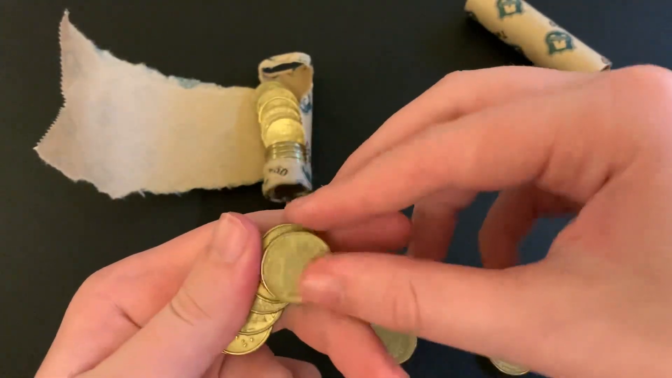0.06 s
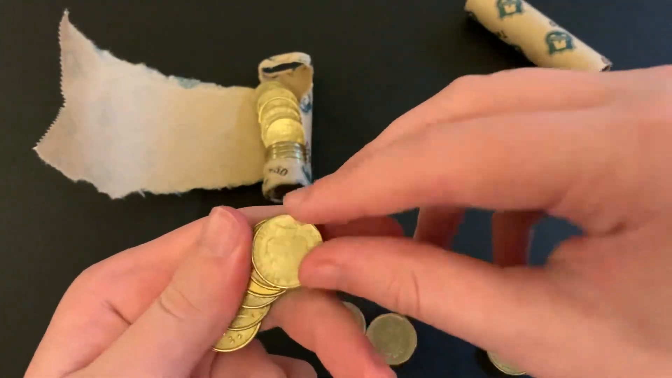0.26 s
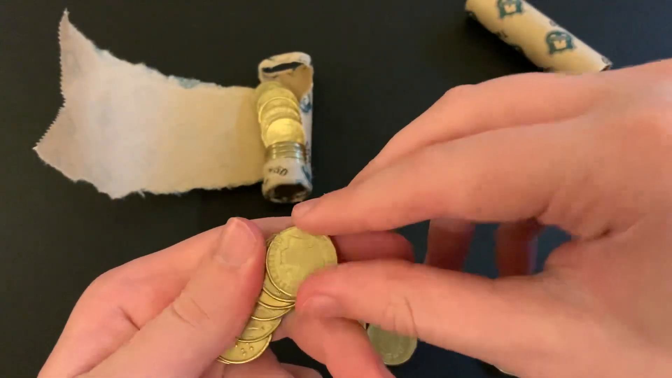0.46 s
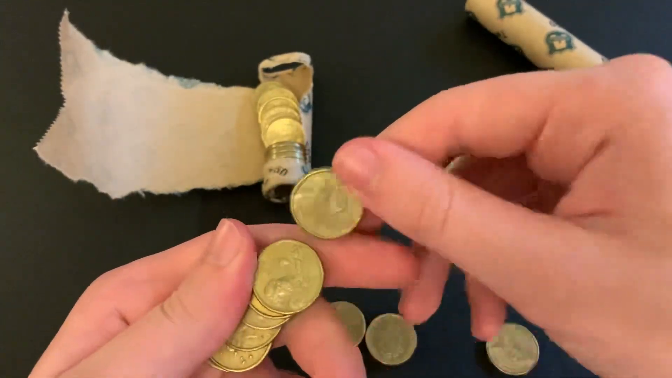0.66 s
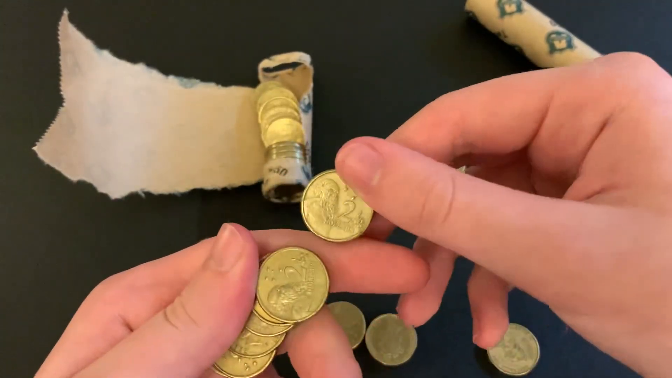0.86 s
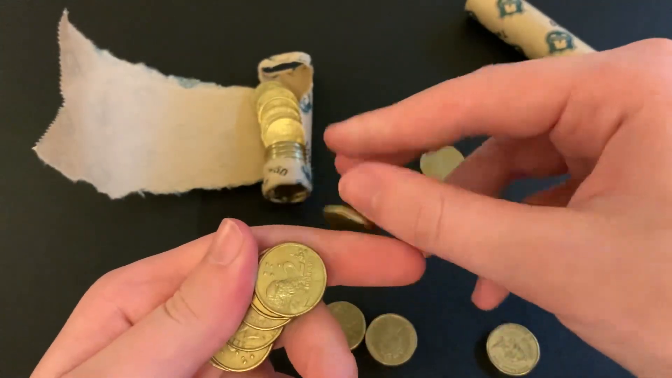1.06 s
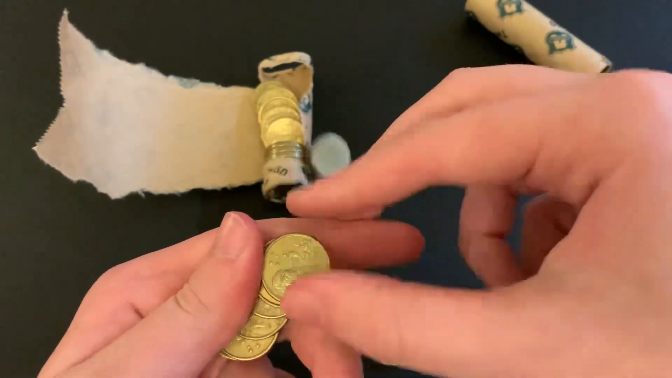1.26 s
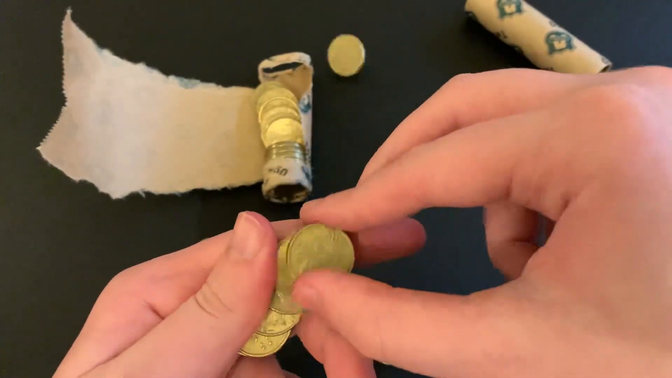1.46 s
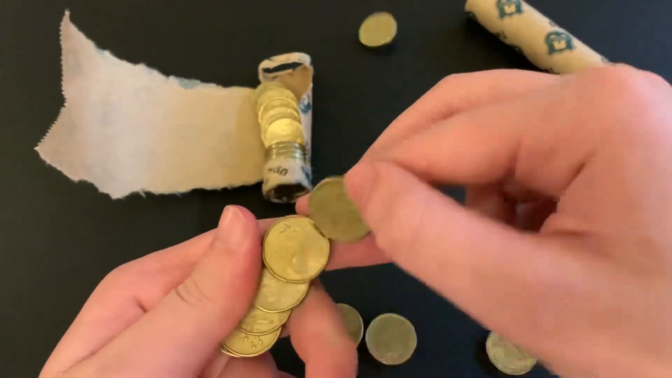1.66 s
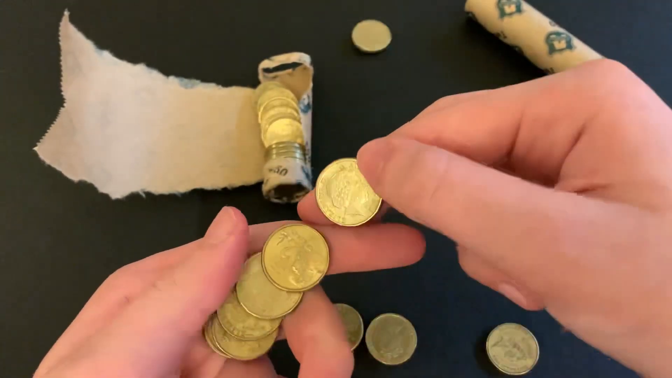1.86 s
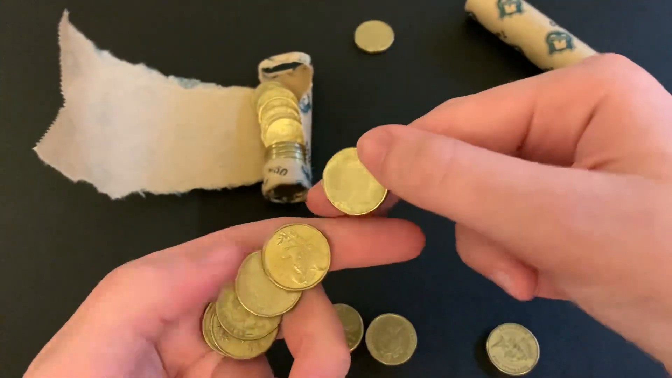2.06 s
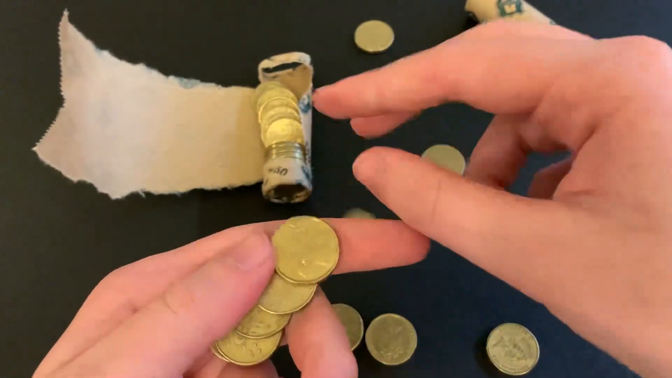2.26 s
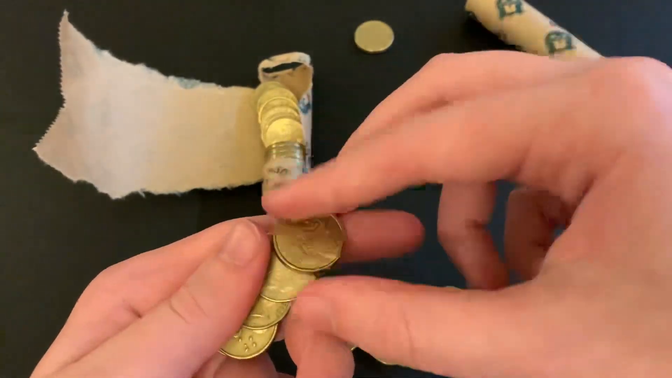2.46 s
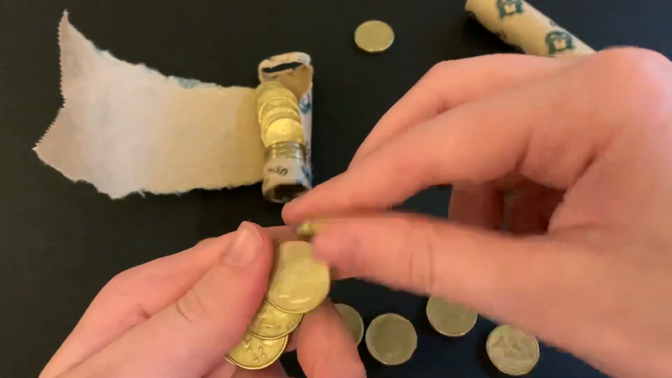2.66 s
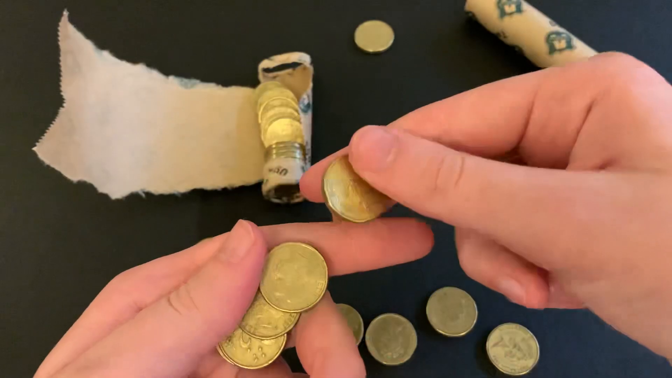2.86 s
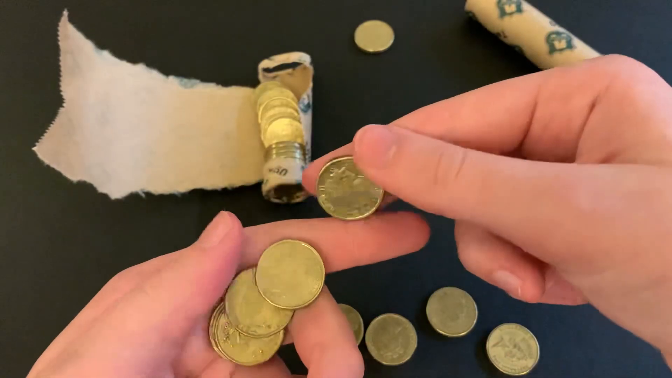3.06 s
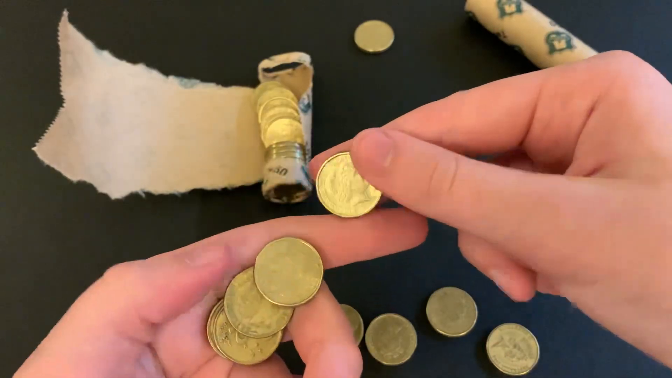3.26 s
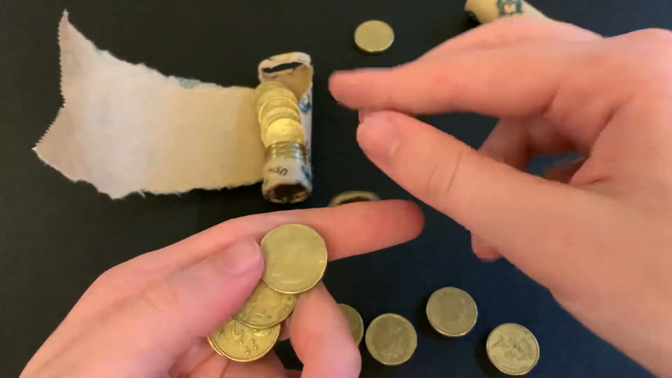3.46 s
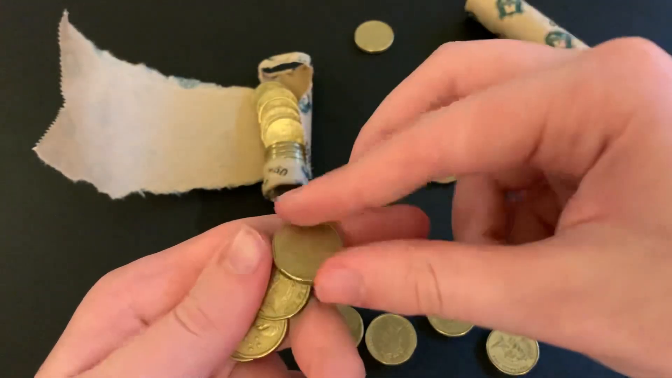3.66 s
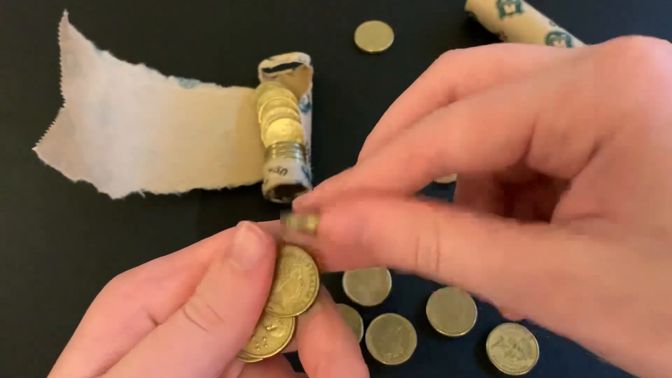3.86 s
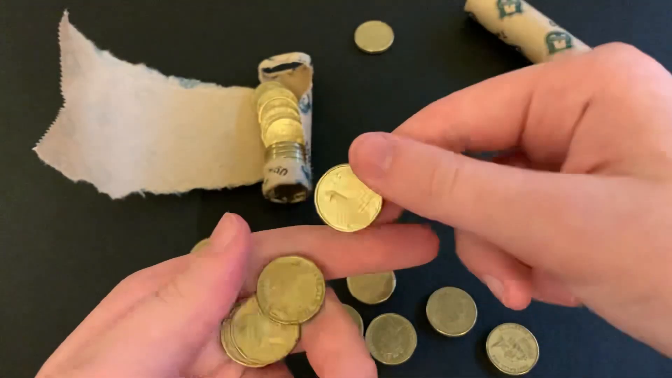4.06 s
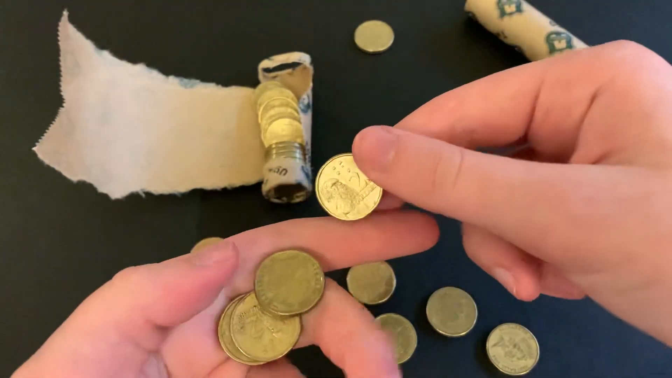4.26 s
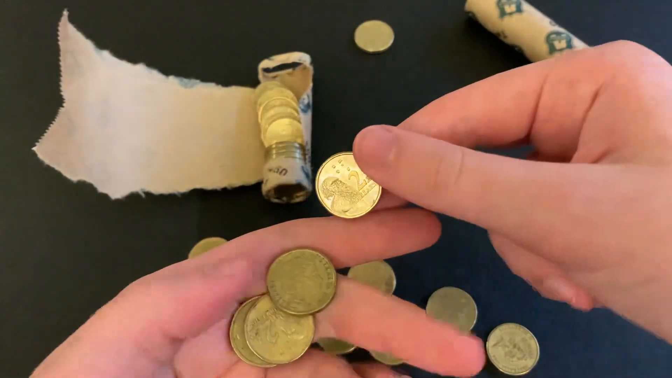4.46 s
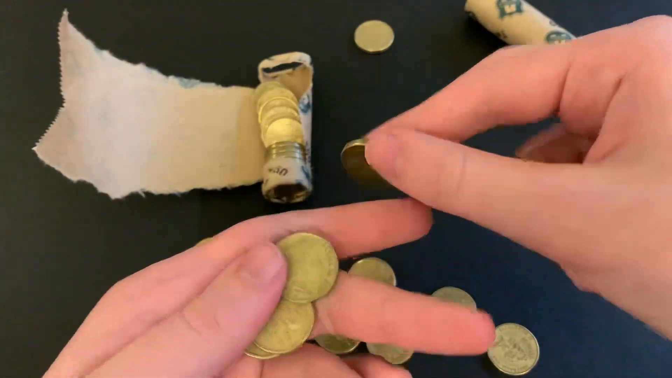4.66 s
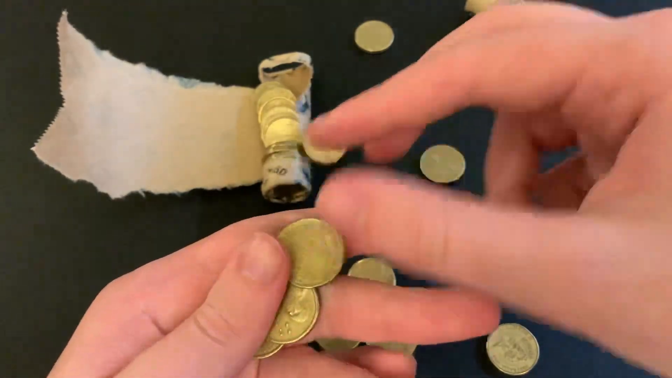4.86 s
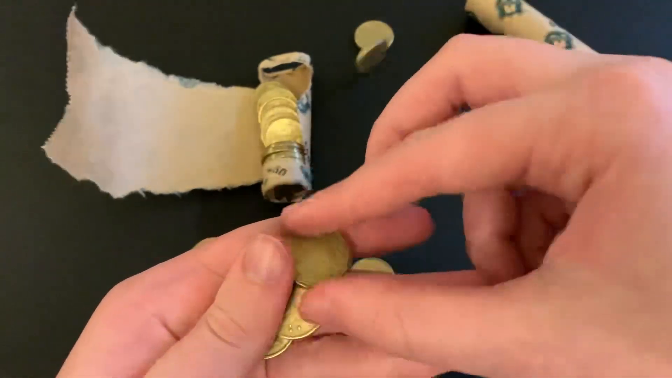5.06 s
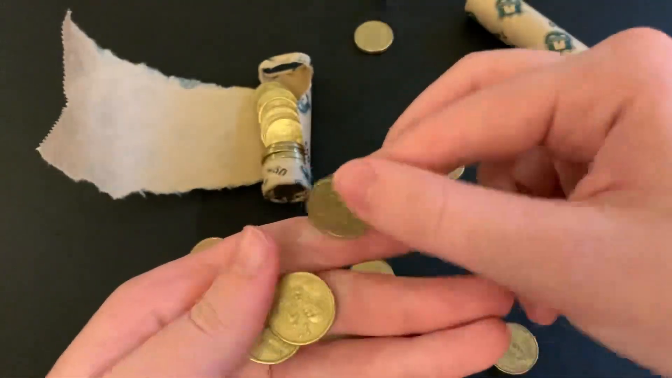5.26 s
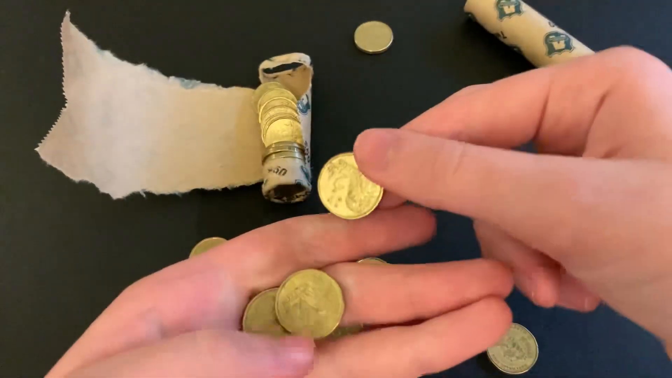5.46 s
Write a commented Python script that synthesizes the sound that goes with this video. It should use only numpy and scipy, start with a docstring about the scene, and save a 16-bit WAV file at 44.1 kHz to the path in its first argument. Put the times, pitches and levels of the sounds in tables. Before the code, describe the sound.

Close to the microphone in a small, quiet room, coins are handled and dropped singly on a hard table. At 0 s an earlier coin rattles quickly to rest; light clinks and faint high rubbing follow from 0.3 to 0.75. A coin knocks down at 1.16 and bounces softly, while the fingers clink and scrape busily from 1.3 to 1.75, with a faint settling rattle from 1.6. A thin rub and slight squeak around 2.0 to 2.35 overlap a hard landing at 2.31 with a tight burst of bounces to 2.5, then a very bright clink at 2.69. Sparse clinks lead to a sharp drop at 3.53, a hissy skid, a knock at 3.65 and a quickening wobble until about 4.05. After a lull, another coin lands at 4.8, bouncing weakly among small clinks to 5.13. Faint knocks end it near 5.5. Low hum, rumble and faint hiss lie beneath.

```python
"""Coins dropped on a hard table

Close to the microphone, coins are thumbed off a stack in one hand and dropped one by one on a hard table.
In the hand they rub (gliding noise bands), squeak and clink (coin modes choked by the fingers).
On the table they knock (short filtered pulses), skid, bounce and wobble to rest, and its modes boom.
A small room answers with decaying noise; in the background a faint low hum glides over rumble and hiss."""
import sys
import numpy as np
from scipy import signal
from scipy.fft import rfft, irfft
from scipy.io import wavfile

SR = 44100
rng = np.random.default_rng(int(sys.argv[2]) if len(sys.argv) > 2 else 0)


def wav_out(sig):
    """Save sig, one row per channel (or a flat mono array), as 16-bit PCM at SR to the path in sys.argv[1]."""
    wavfile.write(sys.argv[1], SR, np.round(np.clip(np.atleast_2d(sig).T, -1, 1) * 32767).astype(np.int16))


N = 242991

# low hum, interpolated between points: (time [s], pitch [Hz], level before wavering [dB])
HUM_GLIDE = sum([ [(0.0, 49.4, -63), (0.106, 52.4, -55.5), (0.332, 59, -56.5), (0.626, 63.8, -63),
             (0.716, 65.4, -77), (1.12, 70.3, -56.5)], [(1.55, 77, -55), (1.948, 83.1, -45),
             (2.706, 94.93, -54.5), (2.908, 88.8, -41), (3.23, 80.25, -42.5), (3.51, 88.35, -41.5)],
             [(3.72, 91.8, -50.5), (3.764, 92.44, -56.5), (4.412, 99.6, -48.5), (4.546, 98.86, -60.5),
             (4.96, 104.5, -46), (5.51, 109.7, -50.5)], ], [])
# shape of the background spectrum: (frequency [Hz], relative density [dB per Hz])
AIR_SPECTRUM = [(20, -11), (32, -7), (45, -6.5), (65, 5), (90, -7), (120, 2.5), (170, -7.5), (260, -7.5),
                (400, -19.5), (600, -28), (1200, -33), (2500, -39.5), (5200, -41), (5950, -40),
                (6800, -45.5), (16000, -47)]
# room echo: (frequency [Hz], relative density [dB per Hz], time to fall by 60 dB [s])
ROOM_DECAY = [(151.2, 15.5, 0.63), (580, 0, 0.56), (1190, 1.5, 0.2544), (2500, -1.5, 0.3417),
              (5000, -1, 0.38), (8700, 0, 0.18), (16200, 0, 0.22)]
# coins rub: over each other, along the fingers, or skidding on the table:
# (start [s], end [s], level [dB], centre [Hz], width [Hz])
RUB_BANDS = [(0, .19, -70.5, 9700, 1600), (0.231, 0.295, -70, 9200, 2500), (0.461, .562, -65.5, 9800, 2400),
             (0.49, .55, -60, 5400, 1500), (1.296, 1.385, -55, 8000, 8100), (1.45, 1.55, -50, 7450, 3100),
             (2.08, 2.3, -69, 5500, 1506), (2.566, 2.628, -59.5, 6750, 2976),
             (2.642, 2.706, -61, 6066, 1555), (3.31, 3.48, -75.5, 4550, 450),
             (3.407, 3.529, -66.5, 6300, 1210), (3.529, 3.688, -47.5, 6800, 3511),
             (4.68, 4.817, -66.5, 6600, 900), (4.701, 4.817, -70.5, 11100, 2540),
             (5.3, 5.381, -67.5, 2250, 1390)]
# squeak between the fingertips: (level [dB], first pitch [Hz], last pitch [Hz], width [Hz])
SQUEAK_BANDS = [(-68.3, 1560, 1150, 140), (-66, 4470, 3810, 260)]
# coin on coin: (time [s], level [dB], centre of the low modes [Hz], upper modes against low [dB])
COIN_CLINKS = [(0.3319, -20, 6300, -0.5), (0.359, -41, 7340, 2), (0.551, -23.5, 6500, -4),
               (0.7419, -33.5, 7100, -1), (1.307, -35.5, 6200, 1), (1.3239, -33, 5400, -1),
               (1.3566, -37.5, 6300, -8.5), (1.4315, -24, 7070, -2.5), (1.4684, -25, 6260, 1),
               (1.4827, -34, 6316, 2), (1.559, -37, 7900, 8.5), (1.6275, -32.5, 7600, 3),
               (1.6572, -27, 8220, -4), (1.695, -16.5, 7900, -6), (1.7297, -33, 6200, -2),
               (1.9739, -32.5, 4435, -2), (2.159, -41.5, 5270, -9), (2.4897, -31, 6300, -6),
               (2.5725, -30.5, 6050, -3.5), (2.5831, -36, 4714, -10.5), (2.678, -32, 6410, -23.5),
               (2.6859, -13.5, 7130, -3), (3.0628, -53.5, 4600, -32), (3.2388, -34, 6540, -6.5),
               (3.5128, -27, 6000, -19), (3.566, -28.5, 6270, -7.5), (4.038, -44.5, 5670, -8),
               (4.8706, -29.5, 4490, -4), (4.904, -41.5, 5630, 8), (5.1044, -36, 7630, 0),
               (5.1227, -37, 7550, -1.5)]
# coin modes between the fingers, before scatter: (frequency [Hz], level [dB], fall by 60 dB [s])
COIN_MODES = [(4905, -2, .006), (5400, -7, 0.021), (5760, -0.5, 0.018), (6360, 4, .007),
              (7210, -1.5, 0.008), (7880, -2.5, 0.0052), (8770, -2, 0.005), (9640, 5, 0.0049),
              (10350, -3, 0.016), (11770, -4.5, .005), (13780, -10.5, 0.0035), (14600, -8, .006),
              (15500, -16.5, .006)]
# tabletop modes: (frequency [Hz], relative level [dB], time to fall by 60 dB [s])
TABLE_MODES = [(95.6, -10.5, 0.44), (119.7, -3.5, .35), (206, -5.5, 0.3), (246, 2, 0.1),
               (264.6, -2.5, 0.37), (300.5, -4.5, 0.37), (346.7, -9, 1), (381, 0, 0.16),
               (439.4, -0.5, 0.13), (465.7, -9, 0.48), (511, -4.5, 0.31), (598, -2, 0.35), (630.3, -1, 0.3),
               (692.4, 0, 0.21), (749, -6.5, 0.41), (831, 0, 0.16), (946, -2.5, 0.15), (1005, -11, 0.47)]
# board resonances round the point of impact: (frequency [Hz], width [Hz], lift [dB])
IMPACT_RESONANCES = [(858.6, 120, 7), (1610, 180, 2.5), (2366, 500, 3.5), (3400, 170, 4), (4322, 500, 2)]
# landings on a stiff part of the board, which barely move its deep modes: (start [s], end [s])
STIFF_LANDINGS = [(-.1, .25), (3.4, 4.2)]
# a coin lands or bounces on the table:
# (time [s], level [dB], pitch [Hz], edge tick [dB], boom drive before the common trim [dB])
TABLE_KNOCKS = [(1.1574, -12.5, 2250, -12, -2), (1.2023, -27.5, 2000, -20, 6), (1.2194, -33, 1905, -24, -1),
                (1.2635, -23, 2073, -30.5, 5), (1.3484, -33.5, 1452, -9, 10),
                (1.3976, -33.5, 1600, -16.5, -5.5), (1.4216, -41.5, 1500, -16.5, 7.5),
                (2.3125, -15.5, 3315, -42, -1.5), (2.3226, -15, 2892, -19, -11),
                (2.4085, -14.5, 1920, -35, -11.5), (2.4203, -17.5, 2300, -27, -13.5),
                (2.4355, -25.5, 1780, -27.5, -8), (2.4673, -21.5, 2020, -23, -9),
                (2.4721, -18, 2080, -16.5, -17.5), (2.503, -29, 2100, -14, -16),
                (3.5297, -13.5, 3500, -25.5, -4.5), (3.5315, -15, 5900, -25.5, -7),
                (3.647, -16.5, 2800, -18.5, -4), (4.795, -14.5, 2912, -21.5, -0.5),
                (4.9333, -24, 2180, -30.5, 2), (4.9891, -34.5, 1801, -27, 9),
                (5.0296, -40.5, 1310, -32.5, -16), (5.1054, -34.5, 1694, -9.5, -6.5),
                (5.4753, -27.5, 2293, -26.5, 3), (5.4937, -29.5, 2350, -32.5, -5)]
# a settling coin rocks round on its milled rim: (first contact [s], first gap [s],
# each gap shorter by [s], level before spread and fade [dB], pitch before spread [Hz],
# boom drive before the common trim [dB])
SETTLING_COINS = [(.001, 0.051, 0.011, -29, 1333, -1.5), (1.612, .0828, .0101, -33, 1930, -2),
                  (3.7531, .0728, .0087, -29, 1942, -3.5)]

FRAME = 2048  # samples in a short sound
BLOW_S = .003  # a blow has the energy of this long at its level; also the lead-in of a rocking contact
AIR_DB = -57
CUT_HZ = 15900
SQUEAK_START_S, SQUEAK_END_S = 2.01, 2.36
# a firmly rubbing coin snags with small clinks: mean rate, level over the rub, spread
SNAGS_PER_S, SNAG_DB, SNAG_SPREAD_DB = 37, 10.5, 5
FIRM_RUB_DB = -63  # rubs at or below this level run without snagging
DETUNE = .025  # spread of the shift of the coin modes by the grip of the fingers (share)
# contacts of a settling coin weaken as the gaps near the fade scale; it lies flat below the rest gap
WOBBLE_FADE_S, WOBBLE_REST_S = 0.035, .009
WOBBLE_CONTACT_S, WOBBLE_TICK_DB = 0.0047, -21.5
# no two contacts are alike: spread of level and of log pitch
WOBBLE_SPREAD_DB, WOBBLE_PITCH_SPREAD = 1.2, .11


def undb(db):
    """Decibels to gain."""
    return 10 ** (np.asarray(db) / 20)


def unit(x):
    """Scale to energy 1."""
    return x / np.sqrt(np.sum(x ** 2))


def blow(x, db):
    """Give a short sound the energy of BLOW_S seconds at this level."""
    return unit(x) * undb(db) * np.sqrt(BLOW_S * SR)


def add(track, s, x):
    """Mix x into the track from time s."""
    i = max(0, int(round(s * SR)))
    track[i:i + len(x)] += x[:max(0, len(track) - i)]


def on_log(f, hz, values):
    """Read a spectrum on a log-frequency axis."""
    return np.interp(np.log(f + 1), np.log(hz), values)


def decay(t, t60):
    """Exponential fall by 60 dB in t60 seconds."""
    return np.exp(-np.log(1000) * t / t60)


def causal(gain):
    """The tightest causal (minimum-phase) response with this magnitude, by folding the cepstrum."""
    cepstrum = irfft(np.log(gain + 1e-5))
    cepstrum[1:len(gain) - 1] *= 2
    cepstrum[len(gain):] = 0
    return irfft(np.exp(rfft(cepstrum)))


def background(waver_db=1):
    """Behind everything, a gliding, slightly wavering hum over low rumble and faint hiss."""
    t = np.arange(N) / SR
    s, hz, db = np.transpose(HUM_GLIDE)
    waver = np.interp(t, np.linspace(0, t[-1], 60), rng.standard_normal(60))
    level_db = np.interp(t, s, db) + waver_db * waver
    cycles = np.cumsum(np.interp(t, s, hz)) / SR
    hum = np.sqrt(2) * undb(level_db) * np.sin(2 * np.pi * cycles)
    gain = undb(on_log(np.fft.rfftfreq(N, 1 / SR), *np.transpose(AIR_SPECTRUM)))
    air = irfft(rfft(rng.standard_normal(N)) * gain, N)
    return hum + unit(air) * np.sqrt(N) * undb(AIR_DB)


def room(x, gap_s=0.0039, early_s=.03, lumpy_db=4):
    """Separate early reflections thicken into a diffuse tail that drops away ever faster, treble first."""
    t, f = np.arange(SR) / SR, np.fft.rfftfreq(SR, 1 / SR)
    hz, db, fall_s = np.transpose(ROOM_DECAY)
    # uneven sample levels make the early part lumpy
    lumps_db = lumpy_db * rng.standard_normal(SR) * np.exp(-t / early_s)
    noise = rng.standard_normal(SR) * undb(lumps_db)
    spectrum = rfft(noise) * undb(on_log(f, hz, db))
    fades = np.exp(-np.log(1000) * (t / fall_s[:, None]) ** 1.25)
    # overlapping bands, one per table row, each with its own fall
    shares = np.eye(len(hz))
    tail = sum(irfft(spectrum * on_log(f, hz, share), SR) * fade for share, fade in zip(shares, fades))
    onset = 1 - np.exp(-(t / gap_s) ** 2)
    return signal.fftconvolve(x, unit(tail * onset))[:N]


def rubs(grain_db=4, sag=.03, fade=1.0):
    """A rubbing coin catches in many tiny slips, heard as grainy noise that falls in pitch as it slows."""
    out = np.zeros(N)
    moves = [(start, end, db, hz * (1 + sag), hz * (1 - sag), width_hz)
             for start, end, db, hz, width_hz in RUB_BANDS]
    moves += [(SQUEAK_START_S, SQUEAK_END_S, *band) for band in SQUEAK_BANDS]
    for start, end, db, first_hz, last_hz, width_hz in moves:
        n = max(FRAME // 4, int((end - start) * SR))
        catch = np.repeat(rng.standard_normal(n), 64)[:n]  # a new strength every 64 samples
        noise = rng.standard_normal(n) + 1j * rng.standard_normal(n)
        slips = noise * undb(grain_db * catch)
        # complex noise limited to half the width, then shifted up to the gliding centre
        lowpass = signal.butter(2, width_hz / 2, fs=SR, output="sos")
        band = signal.sosfilt(lowpass, slips)
        cycles = np.cumsum(np.linspace(first_hz, last_hz, n)) / SR
        tone = np.real(band * np.exp(2j * np.pi * cycles))
        swell = np.abs(np.hanning(n)) ** fade
        add(out, start, unit(tone * swell) * np.sqrt(n) * undb(db))
    return out


def snags(treble_db=-16):
    """Small clinks at chance moments of each firm rub, as rows like those of COIN_CLINKS."""
    rows = []
    for start, end, db, hz, _ in RUB_BANDS:
        # up to ten snags, one at a random place in each successive interval
        chance = zip(rng.random(10), rng.standard_normal(10))
        for k, (place, size) in enumerate(chance):
            s = start + (k + place) / SNAGS_PER_S
            if s < end and db > FIRM_RUB_DB:
                rows.append((s, db + SNAG_DB + SNAG_SPREAD_DB * size, hz, treble_db))
    return rows


def clink(hz, treble_db, chatter, scatter_db, chatter_s=0.0027, crack=2.7, edge_share=.7, focus=0.61):
    """Two coins meet, with or without a moment's chatter, ringing modes that the fingers choke at once."""
    t, f = np.arange(FRAME) / SR, np.fft.rfftfreq(FRAME, 1 / SR) + 1
    push = chatter * rng.standard_normal(FRAME) * np.exp(-(t / chatter_s) ** 3)
    push[0] = 1
    ring = np.zeros(FRAME)
    for (mode_hz, db, t60), (a, b) in zip(COIN_MODES, rng.standard_normal((len(COIN_MODES), 2))):
        tone = np.cos(2 * np.pi * mode_hz * (1 + DETUNE * b) * t)
        ring += undb(db + scatter_db * a) * tone * decay(t, t60)
    # crack: the bare push is heard beside the ring
    sound = rfft(push) * (rfft(ring) + crack)
    # where the coins touch decides which low modes speak; hard contact brings out the upper ones
    low = np.exp(-(np.log(f / hz) / focus) ** 2 / 2) / (1 + (f / 8800) ** 12)
    high = 1 / (1 + (8500 / f) ** 12)
    low = low / np.linalg.norm(low * sound)
    high = high / np.linalg.norm(high * sound)
    bass_cut = np.sqrt(1 + (edge_share * hz / f) ** 6)
    colour = (low + undb(treble_db) * high) / bass_cut
    return irfft(sound * rfft(causal(colour / colour.max() + 0.0078)))


def stack(clinks, chatter, scatter_db):
    """Coins touch one after another, each touch a clink with its own scatter of mode levels."""
    out = np.zeros(N)
    for s, db, hz, treble_db in clinks:
        add(out, s, blow(clink(hz, treble_db, chatter, scatter_db), db))
    return out


def tabletop(pushes, deep_pushes, deep_hz=420, grain_db=-7, grain_t60=0.51, rise_s=0.0012):
    """The board rings in its main modes and a dense wash of weaker ones; deep modes have their own drive."""
    t = np.arange(SR) / SR
    ring = sum(undb(db) * np.sin(2 * np.pi * (hz * t + rng.random())) * decay(t, t60)
               for hz, db, t60 in TABLE_MODES)
    wash_band = signal.butter(2, [260, 1100], "band", fs=SR, output="sos")
    wash = signal.sosfilt(wash_band, rng.standard_normal(SR)) * decay(t, grain_t60)
    rise = 1 - np.exp(-t / rise_s)
    body = unit((unit(ring) + undb(grain_db) * unit(wash)) * rise)
    deep = signal.sosfiltfilt(signal.butter(4, deep_hz, fs=SR, output="sos"), body)
    upper_boom = signal.fftconvolve(pushes, body - deep)
    deep_boom = signal.fftconvolve(deep_pushes, deep)
    return (upper_boom + deep_boom)[:N]


def knock(hz, tick_db, low_share=0.5, high_share=1.457, tick_hz=10000, echo_s=.0012, echo=.16, lag_s=.0006):
    """A rim strikes the table: shorter contact sounds higher, and the small disc radiates little bass."""
    f = np.fft.rfftfreq(FRAME, 1 / SR) + 1
    contact = 1 / (1 + (f / (high_share * hz)) ** 9)
    tick = undb(tick_db) ** 2 / (1 + (f / tick_hz) ** 4)
    board = undb(sum(db / (1 + (2 * (f - centre) / width) ** 2) for centre, width, db in IMPACT_RESONANCES))
    bass_cut = 1 + (low_share * hz / f) ** 5
    pulse = causal(board * np.sqrt((contact + tick) / bass_cut))
    # bending waves are slower at low pitch: 1 kHz arrives lag_s late
    bending = np.exp(-4j * np.pi * lag_s * np.sqrt(1000 * f))
    pulse = irfft(rfft(pulse) * bending)[:FRAME // 2]
    # the hands just above throw back a little of it
    out = pulse.copy()
    for lag, size in zip(rng.uniform(.4, 1.6, 3), rng.normal(0, 1, 3)):
        add(out, echo_s * lag, echo * size * pulse)
    return out


def rocking(length_s, grit=0.2):
    """The milled rim rolls over the board: tiny blows cluster round the main one, which comes after BLOW_S."""
    t = np.arange(FRAME // 4) / SR - BLOW_S
    push = grit * rng.standard_normal(len(t)) * np.exp(-(t / length_s) ** 2)
    push[int(BLOW_S * SR)] = 2
    return push


def wobbles():
    """Contacts of the settling coins, ever closer and weaker towards the end, as rows like TABLE_KNOCKS."""
    rows = []
    for s, gap_s, shrink_s, db, hz, body_db in SETTLING_COINS:
        fade_db = 0
        for size, colour in rng.standard_normal((20, 2)):
            level_db = db + fade_db + WOBBLE_SPREAD_DB * size
            pitch_hz = hz * np.exp(WOBBLE_PITCH_SPREAD * colour)
            rows.append((s, level_db, pitch_hz, WOBBLE_TICK_DB, body_db))
            if gap_s < WOBBLE_REST_S:
                break
            fade_db = 20 * np.log10(np.tanh(gap_s / WOBBLE_FADE_S))
            s, gap_s = s + gap_s, gap_s - shrink_s
    return rows


def drops(boom_db=-5, stiff_db=-11):
    """Landings, bounces and wobbles: the near sound, plain knocks to feed the room, and the board's boom."""
    near, plain, pushes, deep_pushes = np.zeros((4, N))
    for rows, rocks in ((TABLE_KNOCKS, False), (wobbles(), True)):
        for s, db, hz, tick_db, body_db in rows:
            sound, lead = knock(hz, tick_db), 0
            add(plain, s, blow(sound, db))
            if rocks:
                sound, lead = np.convolve(sound, rocking(WOBBLE_CONTACT_S)), BLOW_S
            add(near, s - lead, blow(sound, db))
            push = blow(np.ones(1), db + body_db + boom_db)
            stiff = any(start <= s < end for start, end in STIFF_LANDINGS)
            add(pushes, s, push)
            add(deep_pushes, s, push * undb(stiff_db * stiff))
    return near, plain, tabletop(pushes, deep_pushes)


def scene(table_room_db=-10, hand_room_db=-17):
    """The hands are nearer to the microphone than the table, so they sound drier."""
    knocks, plain_knocks, boom = drops()
    rubbing = rubs()
    touches = list(COIN_CLINKS) + snags()
    clinks = stack(touches, chatter=0.22, scatter_db=3.5)
    # the room is fed clinks without chatter, each mode still scattered in level
    plain_clinks = stack(touches, chatter=0, scatter_db=3.5)
    to_room = undb(table_room_db) * plain_knocks + undb(hand_room_db) * (plain_clinks + rubbing)
    return (knocks + boom + clinks + rubbing + room(to_room) + background())[None]


def record(dry):
    """The recorder behind the microphone cuts the very top with a steep low-pass."""
    return signal.sosfilt(signal.ellip(8, .2, 70, CUT_HZ, fs=SR, output="sos"), dry)


dry = scene()
out = record(dry)
wav_out(out)
```